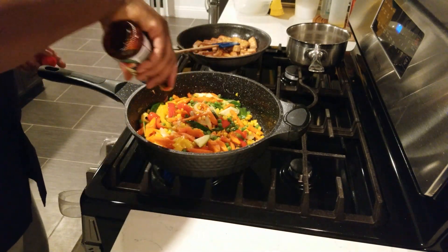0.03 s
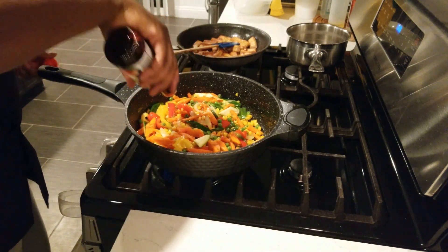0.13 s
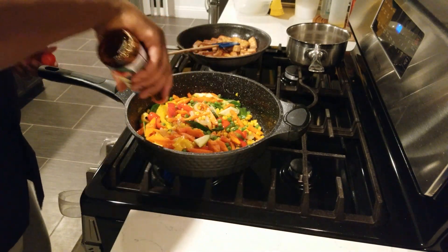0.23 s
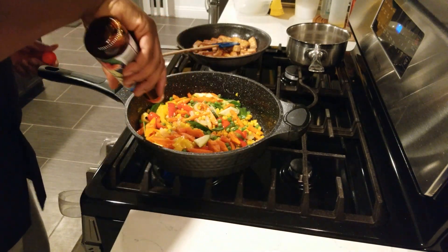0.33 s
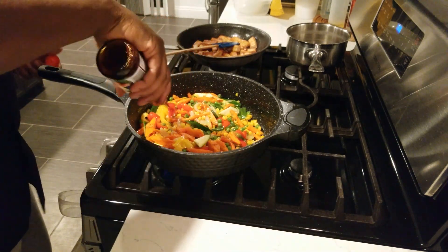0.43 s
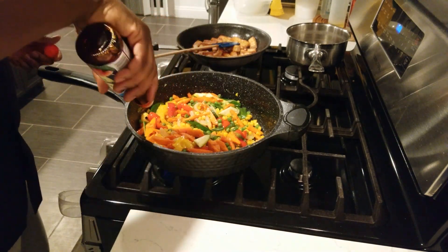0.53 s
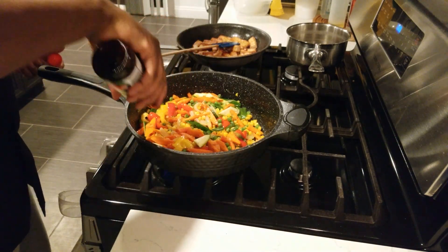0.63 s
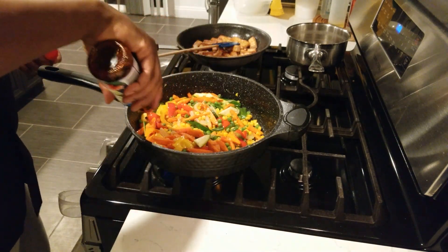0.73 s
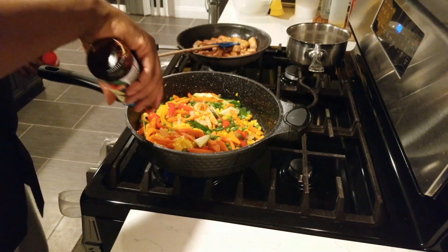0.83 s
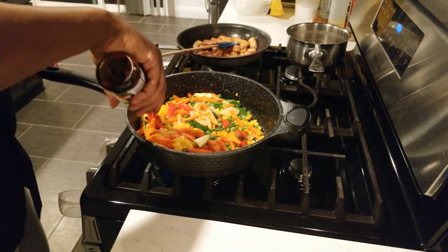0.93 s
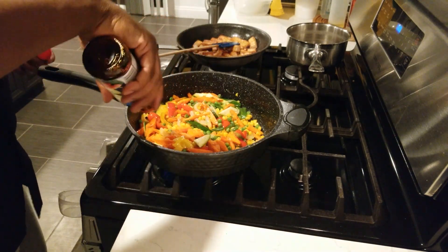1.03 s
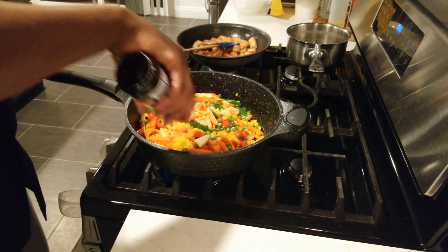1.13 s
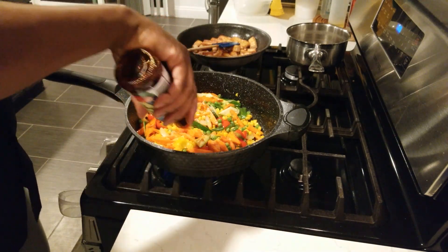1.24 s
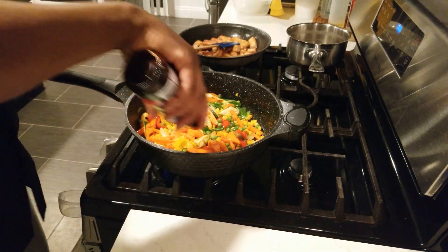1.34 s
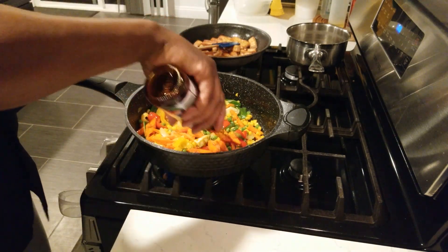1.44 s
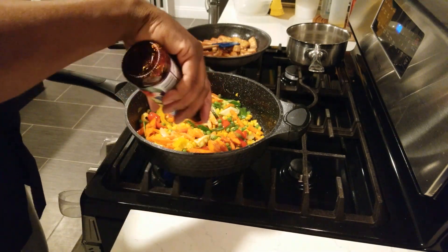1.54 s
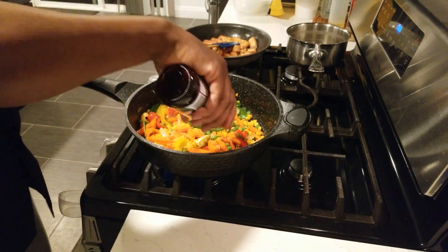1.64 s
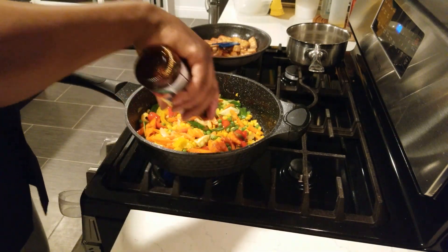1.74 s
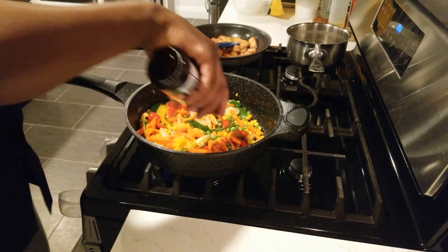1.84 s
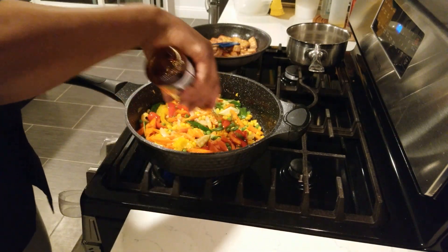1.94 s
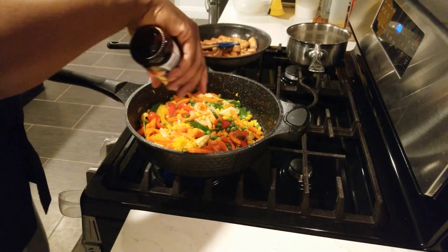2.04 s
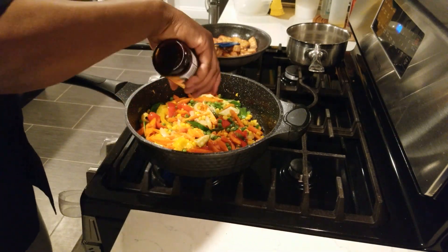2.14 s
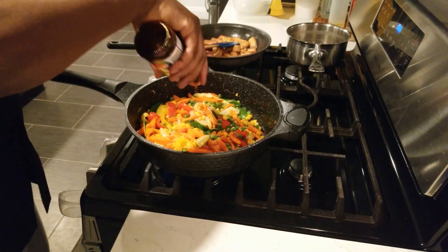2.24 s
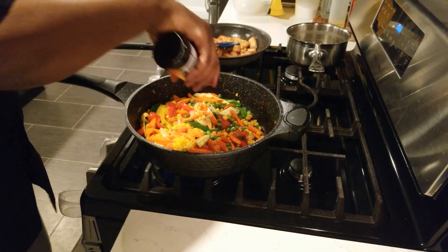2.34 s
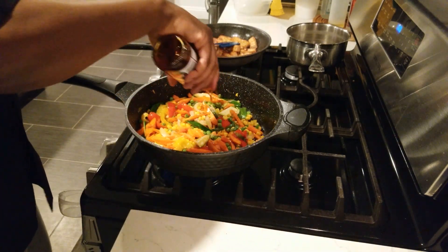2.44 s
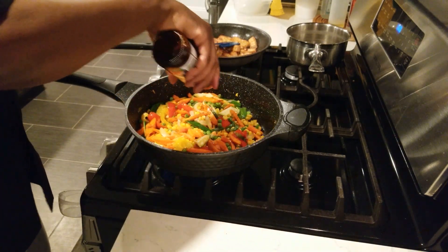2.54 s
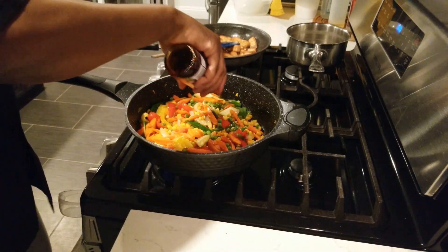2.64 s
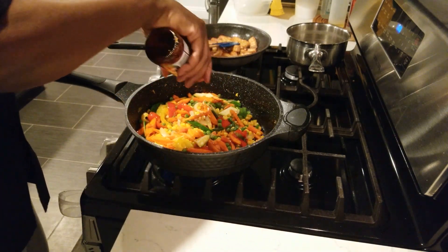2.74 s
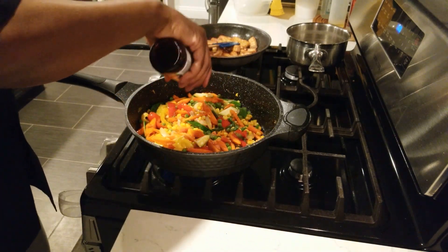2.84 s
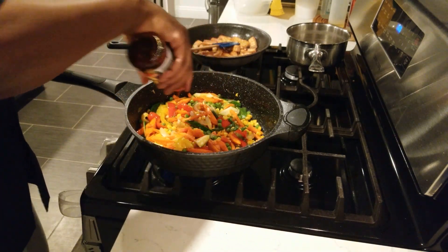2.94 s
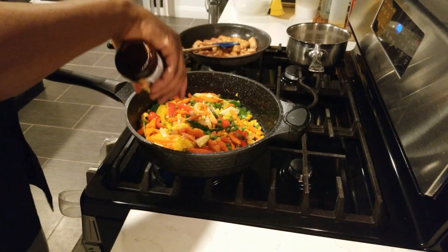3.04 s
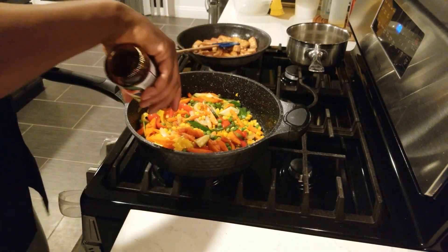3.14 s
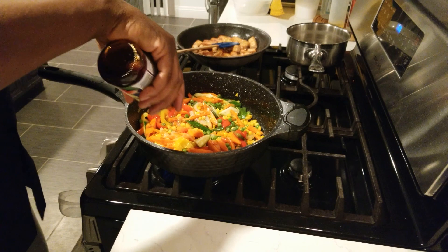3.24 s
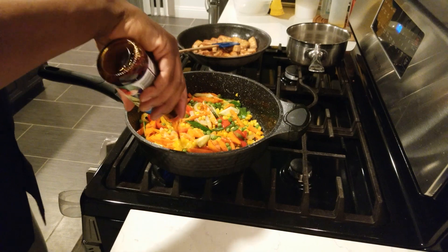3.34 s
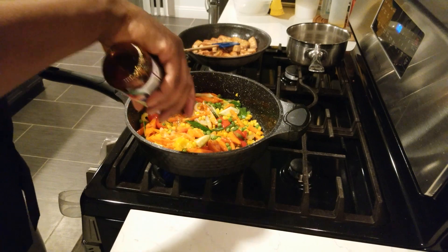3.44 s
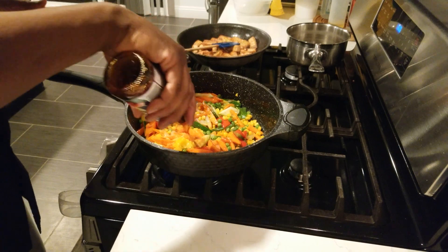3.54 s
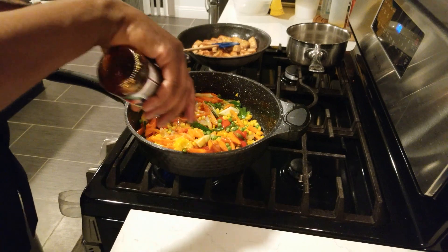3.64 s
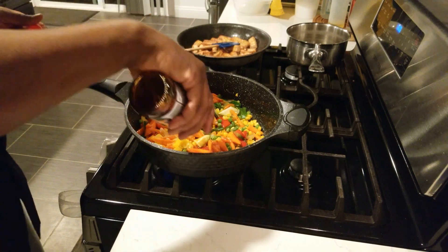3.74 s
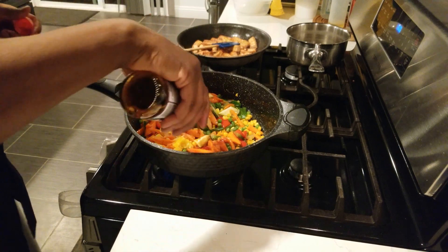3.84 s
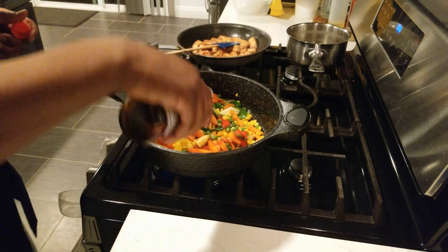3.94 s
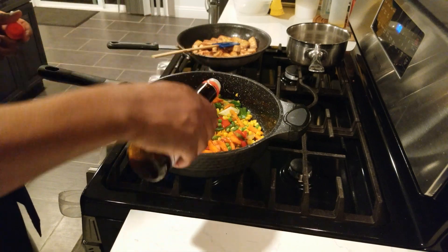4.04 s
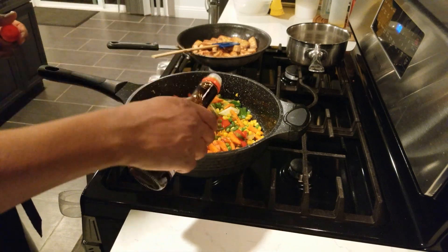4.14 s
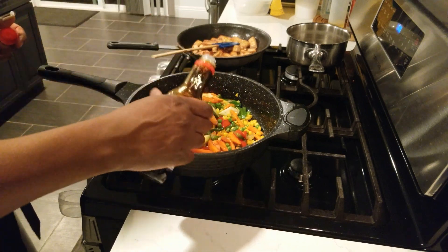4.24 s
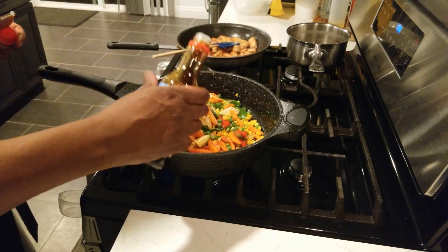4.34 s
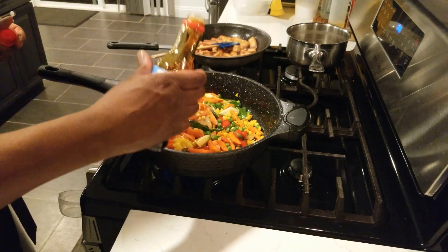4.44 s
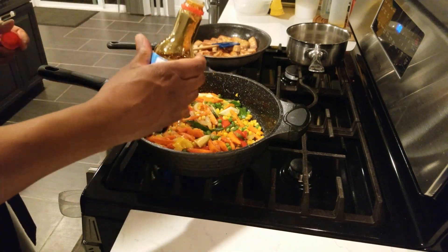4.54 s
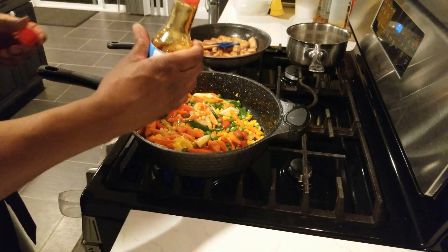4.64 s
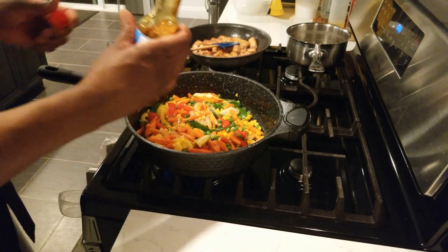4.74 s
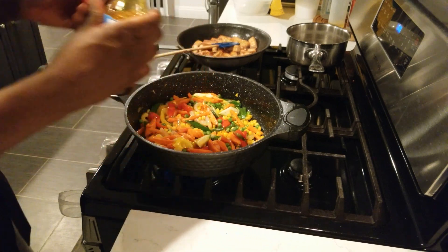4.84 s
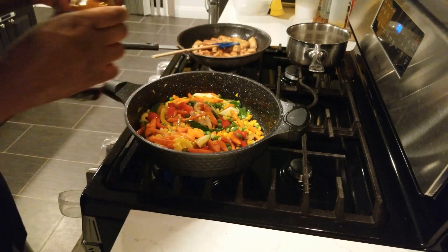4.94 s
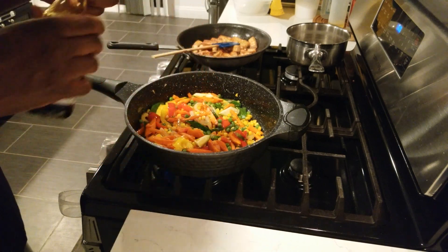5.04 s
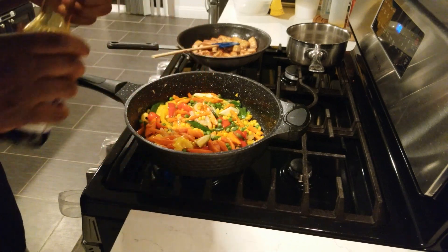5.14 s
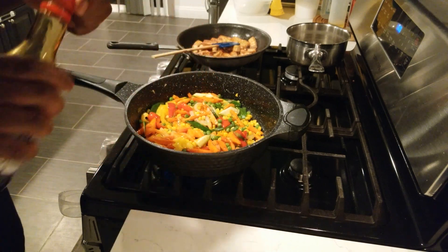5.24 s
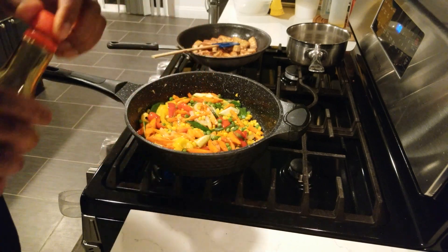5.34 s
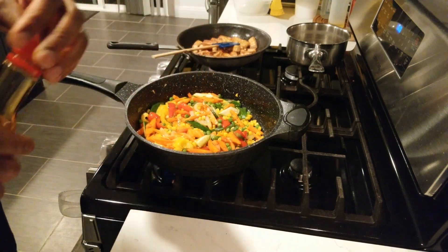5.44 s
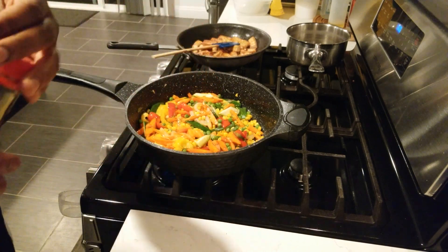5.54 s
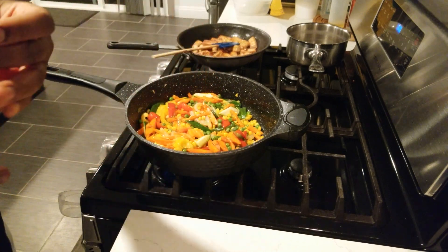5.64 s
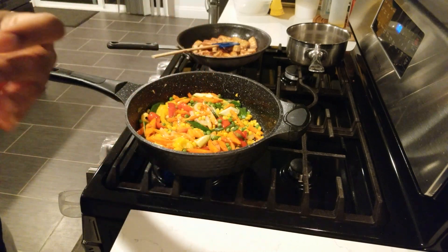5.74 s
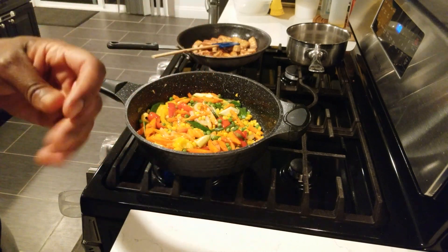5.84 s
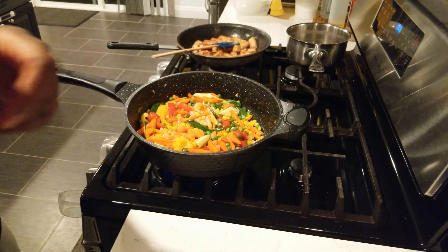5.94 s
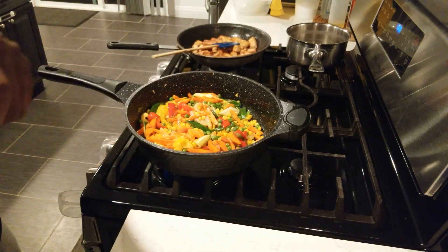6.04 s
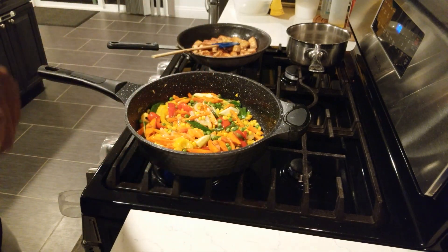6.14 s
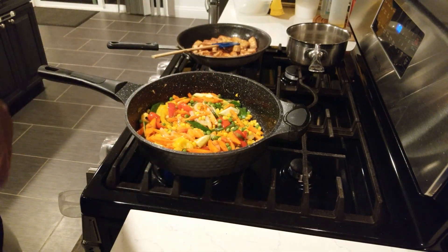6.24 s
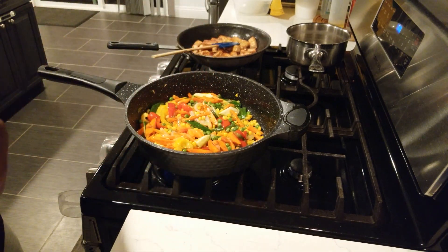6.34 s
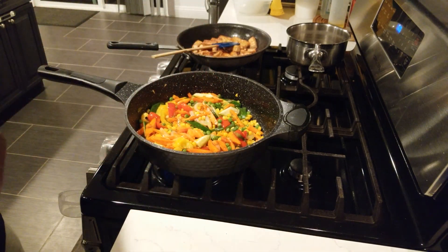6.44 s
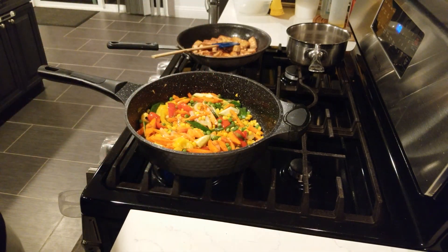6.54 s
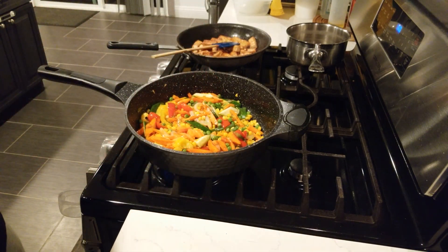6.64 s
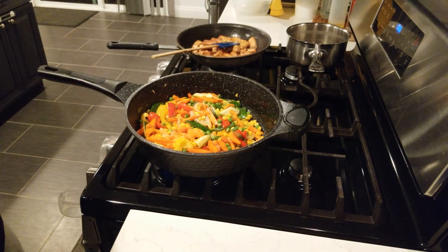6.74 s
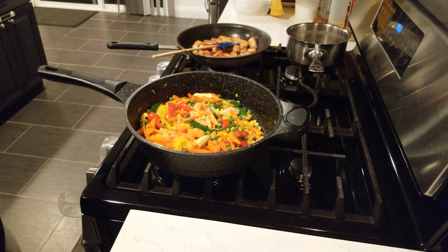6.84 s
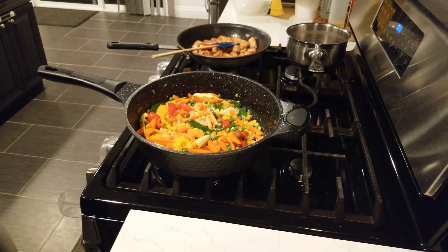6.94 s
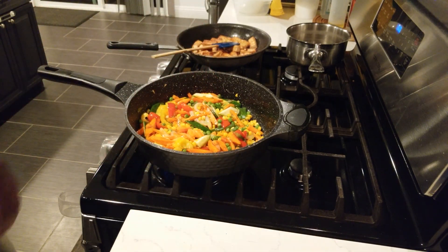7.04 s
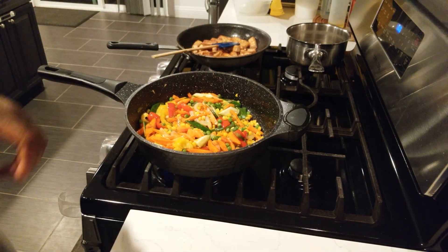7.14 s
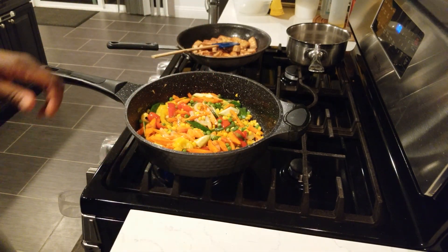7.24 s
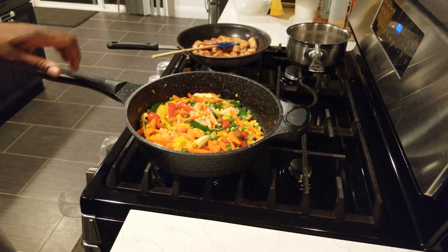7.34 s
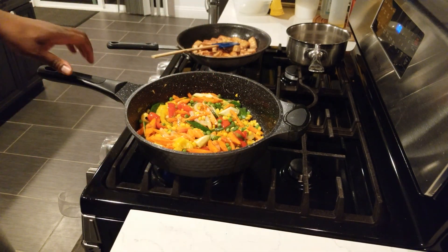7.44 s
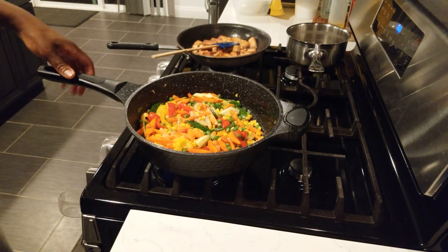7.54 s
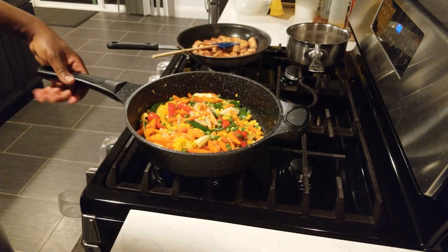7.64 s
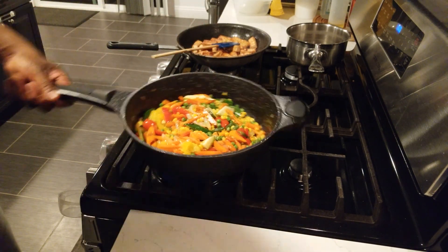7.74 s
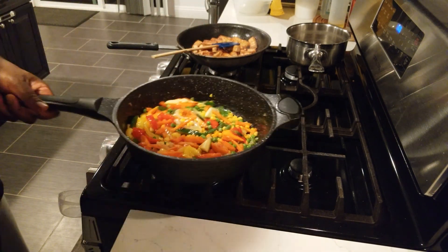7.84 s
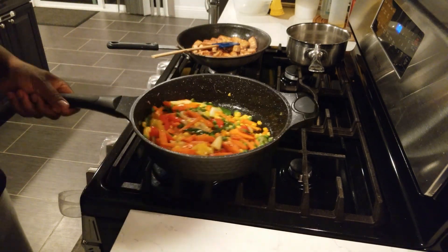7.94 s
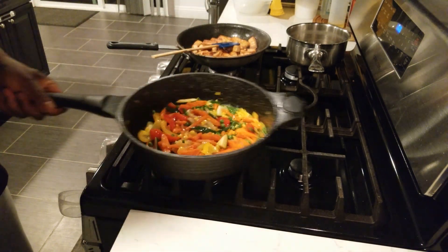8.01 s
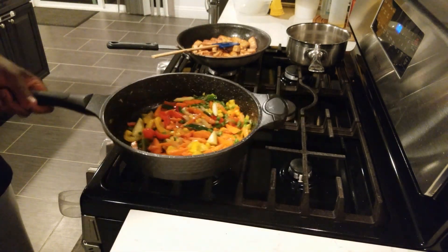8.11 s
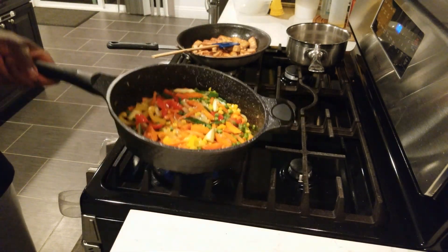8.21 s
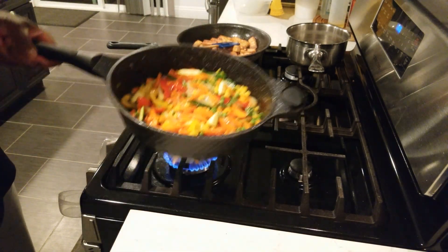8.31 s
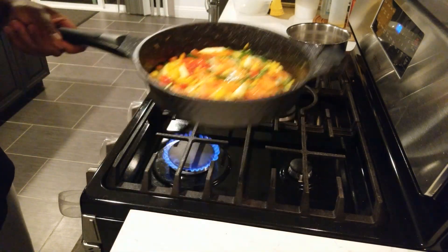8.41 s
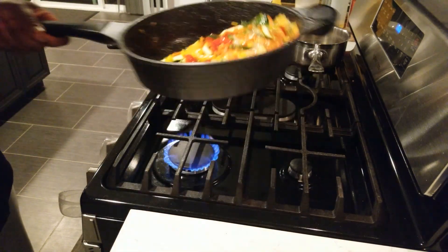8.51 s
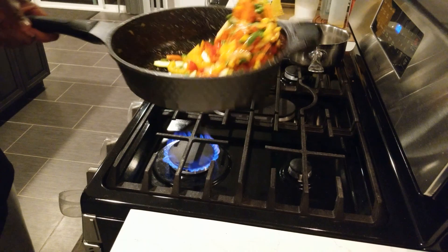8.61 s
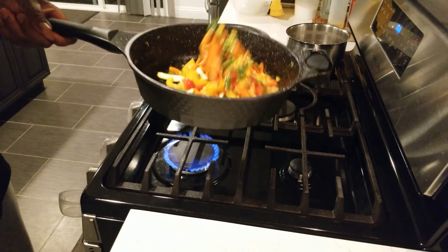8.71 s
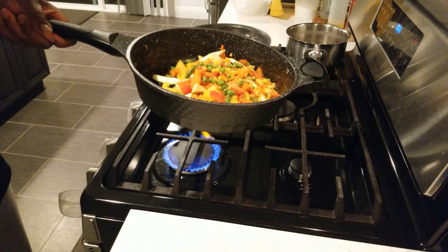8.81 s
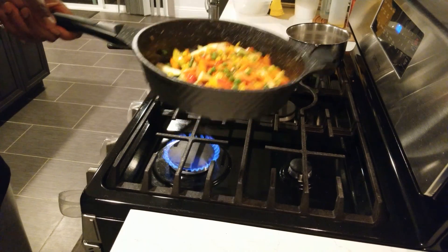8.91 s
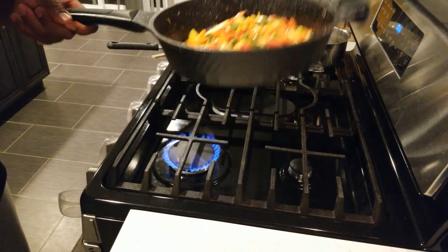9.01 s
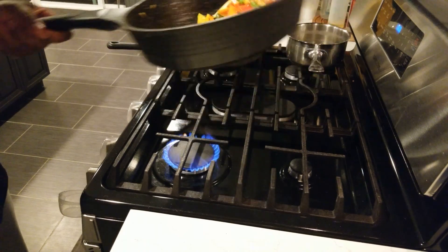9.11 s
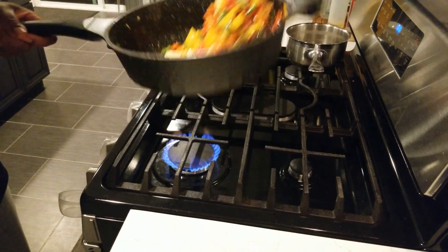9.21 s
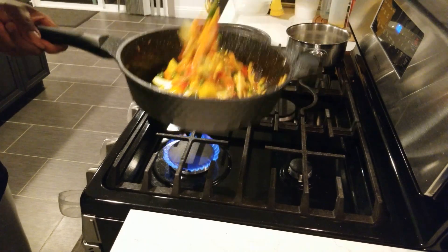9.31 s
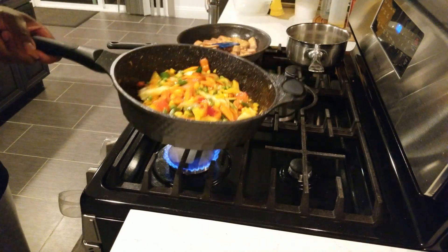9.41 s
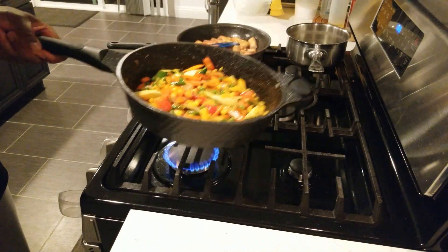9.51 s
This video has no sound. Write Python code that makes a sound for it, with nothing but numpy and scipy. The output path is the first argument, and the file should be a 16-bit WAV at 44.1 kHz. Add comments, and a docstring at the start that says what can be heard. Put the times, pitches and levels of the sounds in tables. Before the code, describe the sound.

Heard close up in stereo, in a kitchen with a short hard echo. From 0 s, vegetables fry softly: countless tiny bubble pings, small steam whistles and sharp oil spits. Sauce pours with faint, ragged rising glugs at about 0.5, 0.8, 1.1, 1.3 and 1.5 s, and the sizzle swells to a full, bright boil by 2 s, staying dense until nearly 8 s. A very low gas roar lies beneath. Slight gulps come near 3, 3.9 and 5.8 s. At 7.2 s a bottle thuds on the counter, its contents slosh in a wobbling hollow note, and lighter taps follow around 7.45 s. From 7.75 to 8.25 s the pan grinds over the iron grate with hard ringing clanks, strongest at 7.9 and 8.0 s. Lifted, the frying thins sharply to light fizz, flaring around 8.4, 9.0 and 9.5 s and ebbing at 8.6 and 9.2 s.

```python
"""Sizzling vegetables and a pouring sauce bottle

Vegetables sizzle in a skillet, made from pinging bubbles, little steam whistles and spits of oil.
Under it a gas flame roars (shaped noise), and sauce glugs from a bottle (rising notes). The bottle is
set down and sloshes; the pan is dragged clanking over the iron grate (ringing tones, noise and clicks),
lifted and tossed, and the sizzle thins out. Heard from close by, in a kitchen with a short echo."""
import sys
import numpy as np
from scipy import signal
from scipy.fft import rfft, irfft, next_fast_len
from scipy.io import wavfile

SR = 44100
rng = np.random.default_rng(int(sys.argv[2]) if len(sys.argv) > 2 else 0)


def unload_audio(sound):
    """Save the sound as a 16-bit wav file, at the path given as the first command line argument."""
    columns = np.transpose(np.atleast_2d(sound))
    # keep every value between -1 and 1, then stretch to whole-number steps
    steps = np.round(np.clip(columns, -1, 1) * 32767)
    wavfile.write(sys.argv[1], SR, steps.astype(np.int16))


N = 422037
SIZE = next_fast_len(N + SR // 4, real=True)  # spectrum length, with room for tails
HZ, TIME = np.fft.rfftfreq(SIZE, 1 / SR), np.arange(N) / SR


def gain_of(db):
    """Turns decibels into a multiplier."""
    return 10 ** (np.asarray(db) / 20)


def evened(x):
    """Scales a signal to an rms (average strength) of one."""
    return x / np.sqrt(np.mean(x ** 2) + 1e-20)


def read(table, hz, axis=1):
    """Reads one column of a table between its rows, along a log-frequency axis."""
    table = np.array(table)
    return np.interp(np.log(hz + 1), np.log(table[:, 0] + 1), table[:, axis])


def add(mix, s, sound):
    """Mixes a sound in at time s, in seconds."""
    part = mix[..., round(s * SR):][..., :sound.shape[-1]]
    part += sound[..., :part.shape[-1]]


def wander(per_s):
    """A random curve with an rms of one that takes a new direction per_s times a second."""
    knots = rng.standard_normal(4000)
    return evened(np.interp(TIME * per_s, np.arange(len(knots)), knots))


def envelope(start, rise_s, hold_s, fade_db_per_s):
    """A gain that rises, holds until hold_s after the start, then dies away."""
    age = TIME - start
    return np.clip(age / rise_s, 0, 1) * gain_of(-fade_db_per_s * np.maximum(age - hold_s, 0))


def clicks(per_s, spread_db):
    """Random clicks of either sign: many small, a few large."""
    chance = rng.random(N)
    at = np.flatnonzero(chance < per_s / SR)
    rank = np.minimum(-np.log(chance[at] * SR / per_s + 1e-12), 6)
    train = np.zeros(N)
    train[at] = gain_of(spread_db * rank) * (-1.) ** at
    return evened(train)


def ports(a, b):
    """Turns two unrelated spectra into the partly alike spectra at the left and right microphones."""
    # the two microphones:
    # (frequency [Hz], likeness [0-1], lead of left [radians], left minus right [dB])
    microphones = [(50, 1, 0.5, -0.5), (400, 0.94, 0.67, 1.5), (750, 0.78, 0.54, 1), (930, 0.65, 1.58, -4),
                   (1340, 0.1, 0.78, 1), (2320, 0.76, 0.5, -1), (3170, 0.75, 1.6, -4.5),
                   (3850, 0.48, 2.5, -5), (4740, 0, 4.5, -4), (5370, 0.4, 4, -2), (7500, 0, 6, 10),
                   (8500, 0, 4.5, 4), (12700, 0, 10.5, -1), (15600, 0.5, -12, 5.5)]
    same = np.clip(read(microphones, HZ), 0, 1)
    side = gain_of(read(microphones, HZ, axis=3) / 2)  # half the difference goes to each side
    lag = np.exp(-1j * read(microphones, HZ, axis=2))
    right = (same * a + np.sqrt(1 - same ** 2) * b) * lag
    return np.array([a * side, right / side])


def coloured(pair, gain):
    """Filters a pair of spectra and turns it into sound, with the average of the sides at an rms of one."""
    x = irfft(pair * gain, SIZE)[:, :N]
    return x / x.mean(0).std()


def dying_noise(table, axis=1):
    """Makes one second of stereo noise as short spectra, each band dying with its own t60."""
    hz, t, z = signal.stft(rng.standard_normal((2, SR)), SR, nperseg=256)
    t60 = np.maximum(read(table, hz, axis=axis), .01)  # time to fall by 60 dB
    return hz[:, None], z * gain_of(-60 * t / t60[:, None])


def hollows():
    """The hard surfaces around the pan strengthen some frequencies and weaken others."""
    # peaks and dips from the pan wall, hob and back panel: (frequency [Hz], width [Hz], level [dB])
    peaks_and_dips = [(287, 44, 4.5), (331, 23, -9.5), (407, 44, 6), (480, 24, -3.5), (604, 24, 7.5),
                      (717, 50, -2), (741, 22, 5), (930, 29, -4.5), (1037, 63, 7), (1056, 36, -8),
                      (1377, 30, 6.5), (1410, 59, -9), (1660, 79, 1), (1714, 41, -6), (1800, 93, 1.5),
                      (2026, 62, -6), (2068, 23, 7), (2610, 72, 3), (2705, 64, -5.5), (4816, 210, -3.5),
                      (5660, 970, 1.5)]
    return gain_of(sum(db / (1 + (2 * (HZ - hz) / width) ** 2) for hz, width, db in peaks_and_dips))


def sizzle(spit_db=-17, squeak_db=-15, flutter_db=0.23, surge_db=0.22, drift_db=0.4):
    """Bubbles, squeaks and sharp spits of oil, coloured by the pan; each size follows its own strength."""
    # colour of the frying: (frequency [Hz], level [dB per Hz])
    frying_colour = [(150, -23.5), (250, -20.5), (480, -17.5), (620, -12.5), (900, -6.5), (1250, -5),
                     (1600, -3), (2400, -1.5), (3100, -3.5), (3800, -1.5), (5600, -3.5), (8900, -17),
                     (12400, -10), (15800, -16.5)]
    a, b = (bubbles(per_s=1300, spread_db=1.0, cycles=2.12, clump_db=1.14) for side in range(2))
    pair = ports(a, b) + gain_of(spit_db) * spits(per_s=220, spread_db=3.6)
    pair += gain_of(squeak_db) * squeaks(per_s=200, ring_s=.018, spread_db=1.4)
    colour = gain_of(read(frying_colour, HZ)) * hollows()

    # split by pitch: large bubbles, small bubbles, fizz, fine spray
    below = [1 / (1 + (HZ / hz) ** 12) for hz in (1300, 4000, 8000)]
    bands = np.diff([0 * HZ, *below, 0 * HZ + 1], axis=0)
    sound = 0
    for band, db in zip(bands, frying_levels()):
        sound = sound + coloured(pair, colour * band) * gain_of(db + drift_db * wander(9))
    return sound * gain_of(flutter_db * wander(70) + surge_db * wander(16))


def bubbles(per_s, spread_db, cycles, clump_db, count=11):
    """Each bursting bubble pings for a few cycles, small ones higher; they come in clumps of many sizes."""
    total, power = 0, 0
    for hz in np.geomspace(700, 14000, count):
        ping = 1 / (1 + 1j * cycles * (HZ / hz - hz / (HZ + 1)))
        train = clicks(per_s * (hz / 2000) ** .5, spread_db)  # small bubbles are more numerous
        total = total + ping * rfft(train * gain_of(clump_db * wander(45)), SIZE)
        power = power + abs(ping) ** 2
    return total / np.sqrt(power)  # evens out the tone before the pan colours it


def spits(per_s, spread_db):
    """Oil spits as sharp clicks, scattered over a few ms by the pan wall and the stove."""
    t = np.arange(SR // 50) / SR
    scatter = rng.standard_normal((2, len(t))) * (np.exp(-t / 0.0004) + 0.25 * np.exp(-t / 0.0099))
    scatter /= np.linalg.norm(scatter, axis=1)[:, None]
    drops = clicks(per_s, spread_db)  # the same drops reach both microphones
    return rfft(drops, SIZE) * rfft(scatter, SIZE)


def squeaks(per_s, ring_s, spread_db):
    """Steam squeezes out from under the vegetables in tiny whistles that slide a little."""
    out = np.zeros((2, N))
    for when, pitch, length, glide, size, lag in rng.random((int(per_s * N / SR), 6)):
        t = np.arange(int(SR * max(ring_s, .002) * (.5 + length))) / SR
        hz = 1400 * 6 ** (pitch ** 1.3) * (1 + 0.071 * (glide - .5) * t / t[-1])
        cycle = np.cumsum(hz) / SR + lag * np.array([[0], [1]])  # the sides are out of step
        note = np.hanning(len(t)) * np.sin(2 * np.pi * cycle)
        add(out, when * N / SR, note * gain_of(spread_db * min(-np.log(size + 1e-9), 4)))
    return rfft(evened(out), SIZE)


def frying_levels():
    """The dB of each bubble size: the sauce boils up, cools the pan, and thins out when lifted and tossed."""
    # how hard the sauce boils as it spreads over the hot pan: (time [s], level [dB])
    boiling = [(0, -11.5), (.5, -9.5), (1.05, -4), (2, -.3), (3.3, -0.1), (5, 0), (7.7, -2.03)]
    # sauce or food lands on hot metal and the frying flares: (time [s], level [dB], half length [s])
    landings = [(.205, 2, 0.0068), (.542, 1, .009), (0.7, 2.5, 0.019), (1.38, 1.5, .04), (2.66, 0.5, 0.1),
                (4.86, 2, 0.021), (8.36, 3.5, 0.05), (8.457, 2.5, 0.033), (8.99, 2, 0.1),
                (9.52, 1.5, 0.034)]
    # food leaves the metal and the frying ebbs: (time [s], level [dB], half length [s])
    tosses = [(8.6, -1.5, 0.064), (9.18, -4, 0.11)]
    # large bubbles, small bubbles, fizz, fine spray: (level at full boil [dB], share of the boil's swing,
    # change as the pan cools [dB per s], change once lifted [dB], share of a flare or toss)
    bubble_sizes = [(-46.5, 0.85, 0.42, -9, 0.22), (-33, 0.98, 0, -10.5, 1), (-39, 0.67, -0.27, -3.5, 1),
                    (-39, 0.47, -0.6, -1.2, 0.36)]
    cools_from_s = 3.05  # the sauce has covered the base and starts to cool it
    lift_s, lift_takes_s = 7.91, 0.66  # the pan is tipped and raised off the flame

    boil = np.interp(TIME, *np.transpose(boiling))
    cooling_s = np.maximum(TIME - cools_from_s, 0)
    lifted = np.clip((TIME - lift_s) / lift_takes_s, 0, 1)
    contact = sum(db * np.exp(-((TIME - at) / half) ** 2) for at, db, half in landings + tosses)
    return [db + swing * boil + cooling * cooling_s + lift_db * lifted + share * contact
            for db, swing, cooling, lift_db, share in bubble_sizes]


def glugs(ragged_db=6.0):
    """Each gulp of air in the bottle rings with a rising note, made ragged by the thick sauce."""
    # air gulps: (time [s], level [dB], starting pitch [Hz], final pitch [Hz], length [s])
    gulps = [(.525, -38.5, 697, 870, 0.032), (0.766, -49, 220, 380, 0.073), (1.078, -47, 598, 714, 0.055),
             (1.275, -47, 280, 450, 0.069), (1.522, -51, 340, 437, 0.065), (3.01, -52, 126, 160, .06),
             (3.87, -48.5, 350, 440, 0.056), (5.788, -47.5, 199, 328, .06)]
    out = np.zeros(N)
    for s, db, start_hz, end_hz, length in gulps:
        hz = np.linspace(start_hz, end_hz, round(length * SR))
        note = np.hanning(len(hz)) * np.sin(2 * np.pi * np.cumsum(hz) / SR)
        add(out, s, gain_of(db) * note)
    ragged = evened(gain_of(ragged_db * wander(400)))
    return out * ragged * np.ones((2, 1))


def slosh(rough_db=5.0):
    """The sauce sways in the standing bottle and bends the note of the air above it."""
    # air note over the swaying sauce, before its wobble: (time [s], pitch [Hz])
    air_note = [(7.24, 378.6), (7.295, 276.3), (7.325, 291), (7.385, 380), (7.43, 343), (7.485, 420),
                (7.515, 311)]
    s, hz = np.transpose(air_note)
    level = envelope(s[0], rise_s=.015, hold_s=0.24, fade_db_per_s=112)
    level = level * gain_of(-39 + rough_db * wander(140))
    pitch = np.interp(TIME, s, hz) * (1 + .06 * wander(200))
    return level * np.sin(2 * np.pi * np.cumsum(pitch) / SR) * gain_of([[-1], [1]])  # right is louder


def bottle_knocks():
    """The bottle meets the counter, and each knock rings both together for a moment."""
    # knocks: (time [s], level [dB], lowest frequency [Hz], brightness [Hz], contact time [s])
    knocks = [(7.2243, -9, 35, 1700, 0.0011), (7.2345, -30, 35, 700, .002), (7.267, -27, 80, 900, .003),
              (7.4435, -20, 150, 800, .002), (7.450, -21.5, 250, 1800, 0.0022),
              (7.461, -25, 200, 1400, .002), (7.512, -33, 200, 500, .003)]
    # ringing of bottle on counter: (frequency [Hz], level [dB], t60 [s])
    counter = [(58, -12, 0.17), (102, -5.5, 0.087), (282, 1.5, 0.058), (371, -3.5, .08), (594, -9, 0.067),
               (711, 0, .08), (920, 1, 0.053), (1105, -7, 0.057), (1410, -4, 0.051), (1910, -12, .05),
               (2290, -12, .04)]
    return blows(knocks, counter, rattle_db=-5, rattle_s=0.055, chatter=0.22, apart_hz=1700)


def pan_clanks():
    """The pan strikes the grate, and the iron rings with many tones."""
    # clanks: (time [s], level [dB], lowest frequency [Hz], brightness [Hz], contact time [s])
    clanks = [(7.767, -30, 200, 2500, .004), (7.8572, -12.5, 130, 1280, .001),
              (7.902, -6.5, 110, 3550, 0.0016), (7.9205, -15, 90, 1200, 0.0017),
              (7.924, -16.5, 1500, 12000, .003), (7.968, -25.5, 50, 1200, 0.0024),
              (7.991, -9.5, 140, 6070, 0.0011), (8.012, -14, 100, 1500, 0.0034),
              (8.044, -18, 400, 2200, 0.0039), (8.1345, -22.5, 99, 890, 0.002),
              (8.163, -24.5, 100, 890, 0.0032), (8.228, -32, 80, 350, 0.0032),
              (8.255, -33, 80, 302, 0.0037)]
    # ringing of pan and grate together: (frequency [Hz], level [dB], t60 [s])
    iron = [(104.7, -12.5, 0.83), (166.4, 0.5, 0.16), (226, -18.5, 1.03), (294, -18, 1.2), (420, -27, 0.56),
            (522, -14, 0.49), (556, -2, 0.18), (619, -9.5, 0.22), (745, -11, 0.16), (818, -4, 0.17),
            (990, -9, .25), (1300, -14, 0.24), (1405, 3, 0.33), (1483, 5.5, 0.12), (1594, 2, .3),
            (1735, 1, 0.22), (1990, -23, .22), (2375, 3, 0.12), (2260, -10, 0.17), (2340, 0, 0.19),
            (2610, -6, 0.18), (2860, -5, 0.13), (3430, -2.5, 0.15), (3900, -2.5, .12), (4660, -3, .12),
            (5030, 1, .1), (5870, 5, 0.072), (6950, 4.5, 0.084)]
    return blows(clanks, iron, rattle_db=-0.5, rattle_s=.4, chatter=0.54, apart_hz=1700)


def blows(rows, modes, rattle_db, rattle_s, chatter, apart_hz):
    """Each blow rings the modes and rattles nearby sheet metal; soft contact dulls it, chatter follows."""
    # dense rattle of the stove's sheet metal, before the extra fade rattle_s:
    # (frequency [Hz], level [dB per Hz], t60 [s])
    sheet_metal = [(25, -3, 0.41), (60, 2, .5), (180, 3.5, 0.33), (400, -2.5, 0.28), (800, 5, 0.2),
                   (2370, 7.5, 0.28), (3520, -2.5, 0.23), (6250, 2, 0.17), (8500, -6, 0.13),
                   (12500, 2, 0.082), (16000, -30, .06)]
    out, t = np.zeros((2, N)), np.arange(SR) / SR
    early = SR // 100  # levels are matched over the first 10 ms
    ring = np.zeros((2, SR))
    for hz, db, t60 in modes:
        # higher modes reach the two microphones further out of step
        lead = rng.choice([-1, 1]) * min(hz / apart_hz, .8) * np.array([[1], [-1]])
        phase = lead + np.pi * rng.integers(2)
        ring += gain_of(db - 60 * t / t60) * np.sin(2 * np.pi * hz * t + phase)
    ring /= ring[:, :early].std()

    for s, db, lowest_hz, bright_hz, contact in rows:
        hz, z = dying_noise(sheet_metal, axis=2)
        z = z + z[::-1] / (1 + hz / 900)  # the bass is common to both sides
        rattle = signal.istft(z * gain_of(read(sheet_metal, hz)), SR, nperseg=256)[1][:, :SR]
        rattle *= np.exp(-t / rattle_s)
        body = ring + gain_of(rattle_db) * rattle / rattle[:, :early].std()
        # one sharp push, then fading chatter
        force = rng.standard_normal(SR // 30) * np.exp(-t[:SR // 30] / contact)
        force *= chatter / np.linalg.norm(force)
        force[0] += 1
        body = signal.fftconvolve(body, force[None], axes=1)[:, :SR]
        edges = [lowest_hz, np.clip(bright_hz, lowest_hz + 10, SR / 2 - 10)]
        body = signal.sosfilt(signal.butter(2, edges, "bandpass", fs=SR, output="sos"), body)
        add(out, s, gain_of(db) * body / (2 * body[:, :early].std()))
    return out


def drag(judder_db=1.5):
    """The pan's base catches and slips on the grate, and the stove top rumbles, until it comes free."""
    # colour of the grinding: (frequency [Hz], level [dB per Hz])
    grinding = [(20, -19), (55, 1), (110, -5.5), (175, 0), (250, -3), (390, -10), (650, -10.5), (1500, -11),
                (2400, -17), (4000, -29), (12000, -49)]
    slips = rfft([clicks(per_s=440, spread_db=0.5) for side in range(2)], SIZE)
    level = envelope(7.75, rise_s=0.032, hold_s=0.37, fade_db_per_s=39.5)
    level = level * gain_of(-37 + judder_db * wander(50))
    return level * coloured(ports(*slips), gain_of(read(grinding, HZ)))


def flame():
    """Burning gas makes a low roar: noise shaped by frequency, with a slowly changing level."""
    # strength of the flame: (time [s], level [dB])
    strength = [(0, -60), (1.8, -54.5), (3.4, -56), (4.3, -58), (9.5, -60.5)]
    # colour of the roar: (frequency [Hz], level [dB per Hz])
    roar_colour = [(15, -27), (30, -17), (45, 6), (65, -2.5), (100, -4.5), (150, -7), (200, -23),
                   (400, -19), (1000, -60)]
    noise = rfft(rng.standard_normal((2, SIZE)))
    roar = coloured(ports(*noise), gain_of(read(roar_colour, HZ)))
    return roar * gain_of(np.interp(TIME, *np.transpose(strength)))


def kitchen(x):
    """Hard walls throw sound back as a short echoing tail, which dies at its own pace in each band."""
    # how long the room rings: (frequency [Hz], t60 [s])
    room = [(100, 0.39), (500, 0.68), (2000, 0.54), (8000, 0.39), (16000, 0.25)]
    tail = signal.istft(dying_noise(room)[1], SR, nperseg=256)[1]
    tail *= np.clip(np.arange(tail.shape[1]) / SR / 0.019, 0, 1) ** 2  # builds up over 19 ms
    return signal.fftconvolve(x.mean(0)[None], tail / np.linalg.norm(tail[0]), axes=1)[:, :N]


def scene():
    """Frying and flame, with the bottle and the pan sounding in the room."""
    bottle = glugs() + slosh() + bottle_knocks()
    pan = pan_clanks() + drag()
    pan = irfft(rfft(pan, SIZE) * hollows(), SIZE)[:, :N]
    echo = gain_of(-15) * kitchen(bottle) + gain_of(-16) * kitchen(pan)
    return sizzle() + bottle + pan + flame() + echo


def record(dry):
    """Cuts off the very highest treble, as the recorder does."""
    low_pass = signal.firwin(511, 15850, window=("kaiser", 9), fs=SR)  # cutoff in Hz
    return signal.oaconvolve(dry, low_pass[None], "same")


dry = scene()
out = record(dry)
unload_audio(out)
```